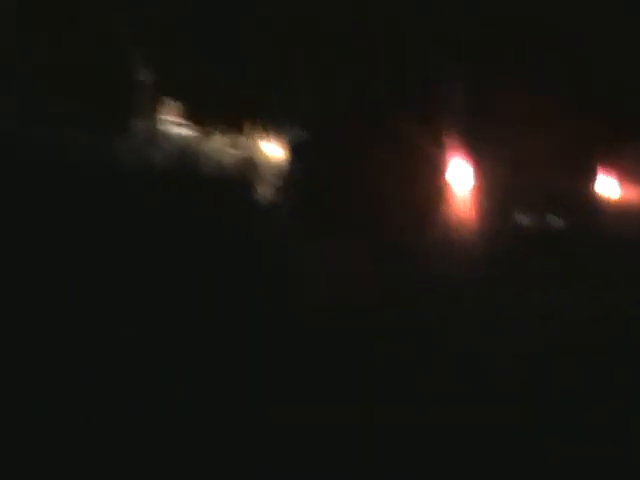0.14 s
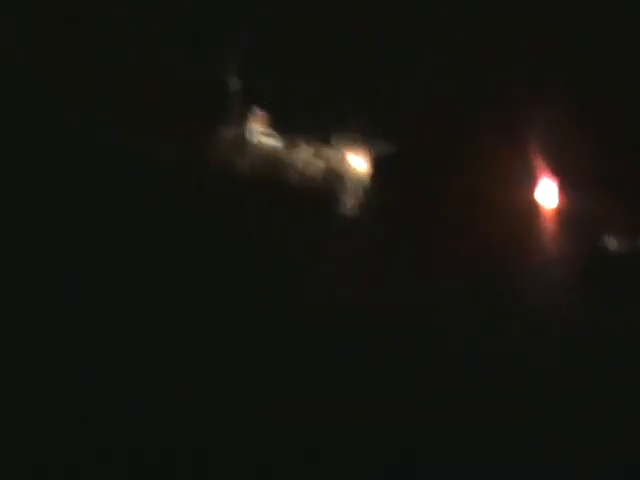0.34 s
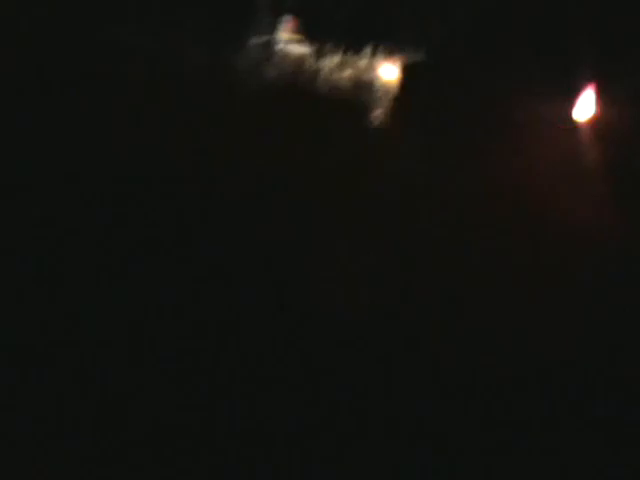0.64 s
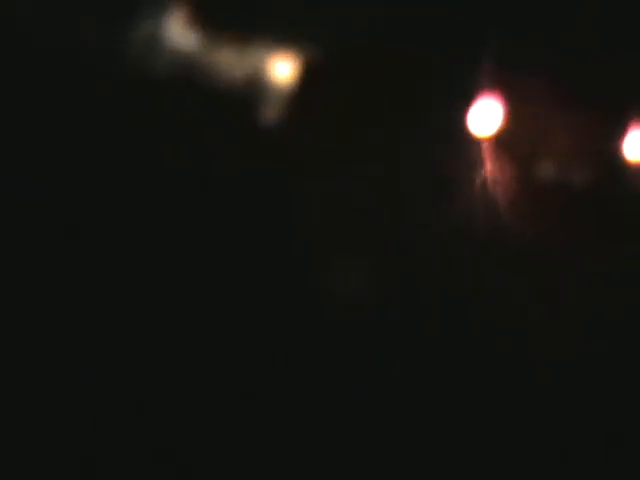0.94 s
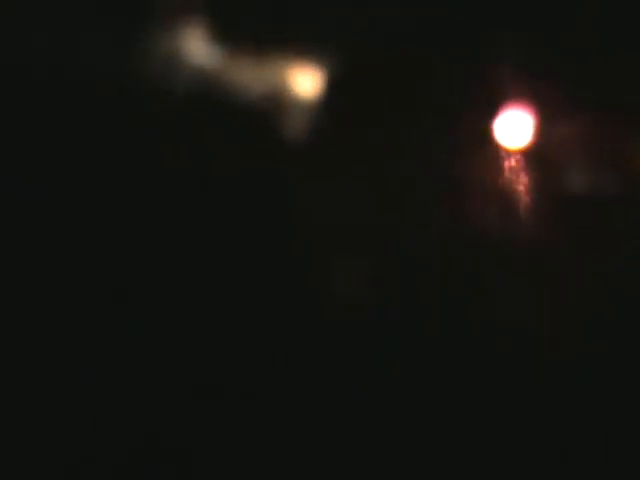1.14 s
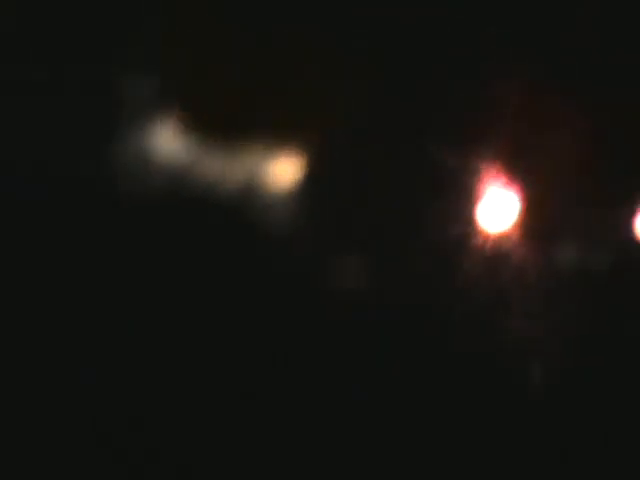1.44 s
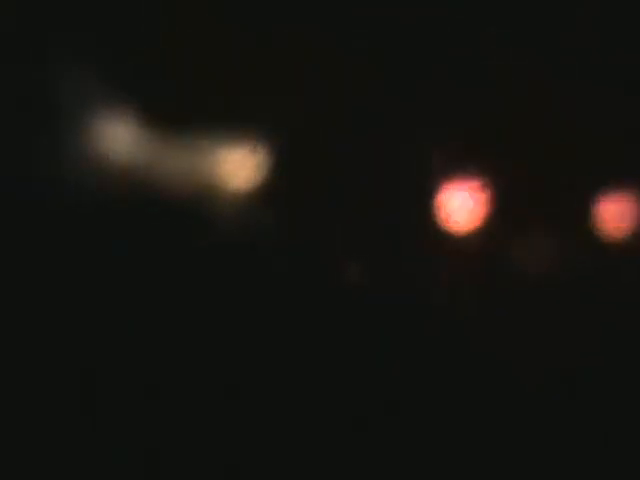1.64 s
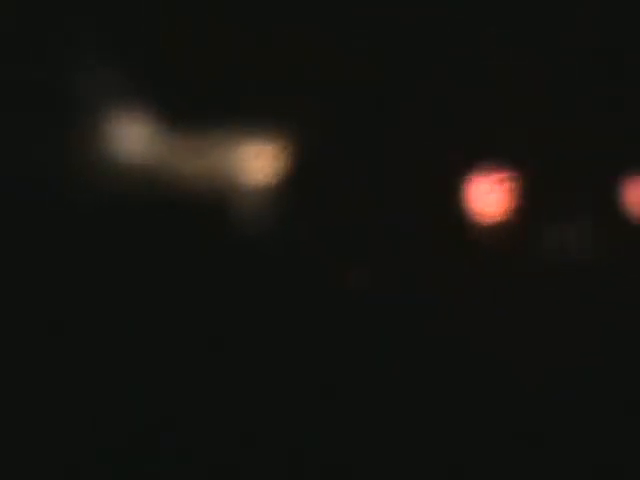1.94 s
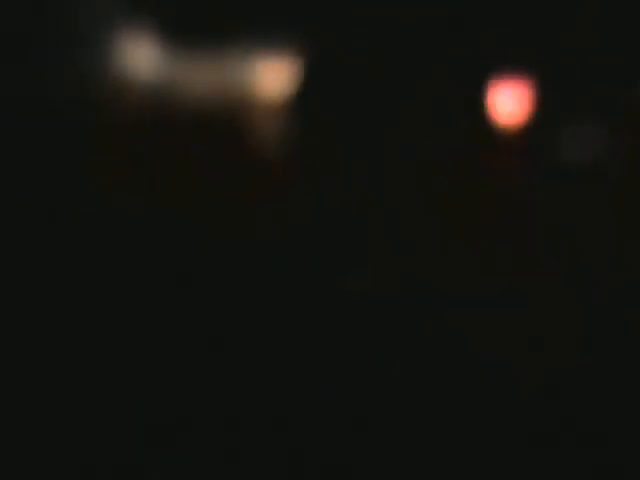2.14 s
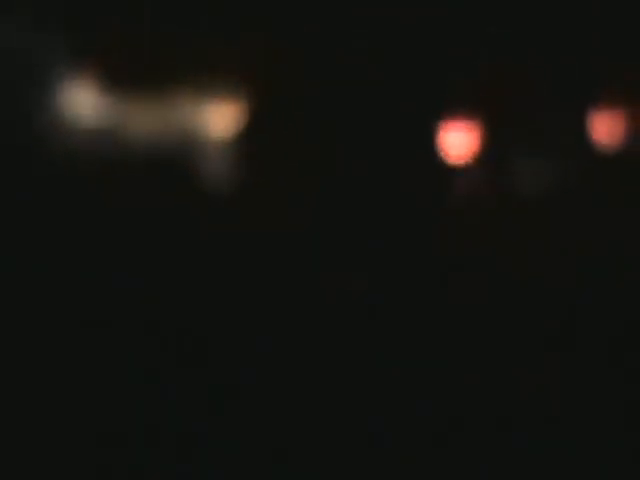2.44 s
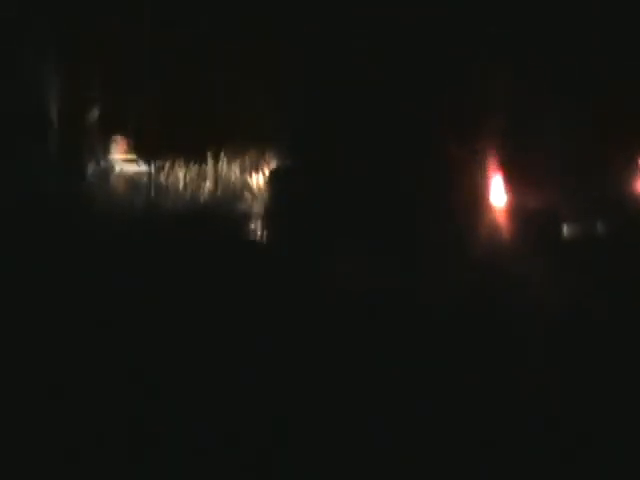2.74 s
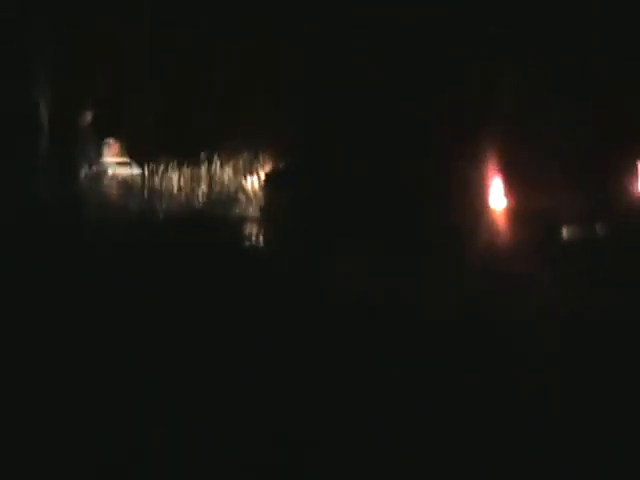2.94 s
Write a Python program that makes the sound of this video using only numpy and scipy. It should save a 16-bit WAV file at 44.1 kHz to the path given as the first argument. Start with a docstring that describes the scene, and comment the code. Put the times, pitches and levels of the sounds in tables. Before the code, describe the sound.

Engine idles low and uneven close by, sags slower, then revs up hard with rasping gas

```python
"""An engine idles close by, with soft scuffs, two faint squeaks and some ticks around it.
At idle, uneven firings from two cylinder banks boom in the exhaust over a whirr.
Then the engine slows and sags, and last it revs up hard: stronger firings ring the pipe
around a clean firing tone, while rushing gas rasps and hisses. Filtered noise and pulses plus
one clean tone; one engine-speed curve paces the firings, and tables time the rest."""
import sys
import numpy as np
from scipy import signal
from scipy.fft import rfft, irfft
from scipy.io import wavfile
from scipy.ndimage import uniform_filter1d

SR = 44100
rng = np.random.default_rng(int(sys.argv[2]) if len(sys.argv) > 2 else 0)


def master(y):
    """Save y as 16-bit WAV."""
    cut = np.clip(np.atleast_2d(y).T, -1, 1)
    pcm = np.round(cut * 32767)  # scale
    wavfile.write(sys.argv[1], SR, pcm.astype(np.int16))


N = 136710  # length in samples, 3.1 s
T = np.arange(N) / SR  # time of each sample, s
FREQS = np.maximum(np.fft.rfftfreq(2 * N, 1 / SR), 1)  # filter frequencies, Hz, kept above zero

# gas flow under throttle: (time [s], rasp level [dB], hiss level before its trim [dB])
GAS_FLOW = [(0, -97, -83), (2.1, -98, -75), (2.255, -51, -52.5), (2.272, -46, -47), (2.302, -45, -50),
            (2.313, -27.5, -37.5), (2.37, -36.5, -33.5), (2.42, -29.5, -35), (2.49, -30, -31),
            (2.52, -32, -36.5), (2.66, -29, -34.5), (2.85, -27, -32.5), (2.92, -31, -35.5),
            (3.1, -30.5, -38.5)]
# exhaust under throttle: (time [s], boom level before its trim [dB], firing tone level before its trim [dB])
THROTTLE_LEVEL = [(0, -90, -73), (2.15, -106, -70), (2.26, -46.5, -44), (2.33, -22, -22),
                  (2.45, -18.5, -19), (2.6, -18.5, -19.5), (2.74, -15.5, -17), (2.87, -18, -13),
                  (3.1, -14.5, -17.5)]


def undb(db):
    """Turn decibels into a gain."""
    return 10 ** (np.asarray(db) / 20)


def unit(x):
    """Scale a sound to an average strength (rms) of 1."""
    return x / (np.std(x) + 1e-12)


def curve(rows, axis=1):
    """Join one column of a table by straight lines in time."""
    rows = np.array(rows, float)
    return np.interp(T, rows[:, 0], rows[:, axis])


def over_hz(rows):
    """Join a table by straight lines over log frequency."""
    rows = np.array(rows, float)
    return np.interp(np.log(FREQS), np.log(rows[:, 0]), rows[:, 1])


def through(x, response):
    """Filter a sound by a frequency response, padded so that its end does not wrap around."""
    return irfft(rfft(x, 2 * N) * response)[:N]


def colour(rows):
    """Build a filter with the given spectrum that only acts after its input (minimum phase)."""
    cepstrum = irfft(np.log(undb(over_hz(rows))))
    return np.exp(rfft(2 * cepstrum[:N], 2 * N) - cepstrum[0])


def resonances(rows):
    """Add up resonators side by side; each dB sets the power that one passes from white noise."""
    total = 0
    for hz, width, db in rows:
        ring = 1 + 1j * (FREQS ** 2 - hz ** 2) / (FREQS * width)
        total = total + undb(db) / np.sqrt(width) / ring
    return total


def noise(response):
    """Make filtered noise of rms 1."""
    return unit(through(rng.standard_normal(N), response))


def band(hz, octaves):
    """Make a bell-shaped response around a centre, leaning towards the low side."""
    bell = np.exp(-(np.log2(FREQS / hz) / octaves) ** 2 / 2)
    return bell / np.sqrt(1 + FREQS / hz)


def walk(rate):
    """Wander smoothly at random with a spread of 1; a higher rate (Hz) wanders faster."""
    return noise(np.exp(-(FREQS / rate) ** 2))


def swell(at, half):
    """Rise and fall in a smooth bell shape around a moment."""
    return np.exp(-((T - at) / half) ** 2 / 2)


def whirr(puff):
    """Coloured noise behind the idle, fairly even at first and louder towards the end."""
    # spectrum: (frequency [Hz], relative level [dB])
    spectrum = [(25, 0), (100, 0), (400, 7), (560, 1.5), (720, 4.5), (1000, -4), (1400, -4), (1900, -9.5),
                (2400, -9.5), (3300, -16.5), (6000, -22.5), (10000, -27.5), (12500, -36), (16000, -21)]
    # loudness: (time [s], level [dB])
    level = [(0, -46), (.7, -47.5), (1.4, -45), (1.7, -48.5), (2.1, -46.5), (3.1, -34)]
    # the puffs make it pulse slightly with each firing
    return noise(colour(spectrum)) * puff ** 0.36 * undb(curve(level) + .5 * walk(30))


def scuffs():
    """Soft bands of noise swell and fade, with a fast random flicker that makes them grainy."""
    # (time [s], half length [s], level [dB], centre [Hz], width [octaves])
    scuff_rows = [(0.077, 0.034, -61.5, 4750, 0.73), (1.224, 0.029, -43, 930, 0.98),
                  (1.233, .04, -28, 225, 0.59), (1.218, 0.023, -58, 4200, 0.61),
                  (1.307, 0.025, -53.5, 5300, 0.62), (1.31, 0.037, -45.5, 900, 1.04),
                  (1.44, 0.022, -61.5, 7500, 0.63)]
    out = np.zeros(N)
    for at, half, db, hz, octaves in scuff_rows:
        grain_db = 2.36 * walk(150)
        out += noise(band(hz, octaves)) * undb(db + grain_db) * swell(at, half)
    return out


def squeaks():
    """Thin squeaks: noise through a set of resonances swells and fades."""
    # (time [s], half length [s], level [dB])
    squeak_rows = [(0.468, 0.011, -51), (0.531, 0.018, -54)]
    # resonances: (frequency [Hz], width [Hz], relative level [dB])
    modes = [(2360, 220, 6), (5160, 220, 4), (6300, 320, -0.5), (7300, 300, -2), (8700, 170, -0.5),
             (10300, 300, -17)]
    out = np.zeros(N)
    for at, half, db in squeak_rows:
        out += noise(resonances(modes)) * undb(db) * swell(at, half)
    return out


def ticks():
    """Ticks: a band of noise starts abruptly and dies away at once."""
    # (time [s], level at the start [dB], centre [Hz], width [octaves], decay [s])
    tick_rows = [(.161, -51, 2320, 0.13, 0.0031), (.328, -54, 4230, 0.61, 0.0094),
                 (1.055, -48, 5160, 0.75, .0015), (1.531, -54, 7900, .9, 0.0022),
                 (1.64, -39.5, 2650, 0.82, 0.0014), (2.0928, -35.5, 4001, 2.5, 0.00056)]
    out = np.zeros(N)
    for at, db, hz, octaves, decay in tick_rows:
        out += noise(band(hz, octaves)) * undb(db) * (T >= at) * np.exp(-np.abs(T - at) / decay)
    return out


def firings(turns, hz, jitter, scatter_db, burble):
    """Each firing gives a pulse and a puff of turbulence; returns their mix and the puff's envelope."""
    # order in which the two cylinder banks fire: one bank number (0 or 1) per firing
    bank_order = np.array([0, 1, 0, 0, 1, 0, 1, 1])
    lag_s, bank_db = .0017, -1  # the second bank's pipe is longer and weaker, so the beat lopes
    count = np.arange(1, int(turns[-1]))
    chance = rng.standard_normal((400, 2))[count]
    bank = bank_order[count % len(bank_order)]

    at_s = np.interp(count + jitter * chance[:, 0], turns, T) + bank * lag_s
    at = np.sort(np.minimum((at_s * SR).astype(int), N - 1))  # in samples
    size = undb(bank * bank_db + scatter_db * chance[:, 1])
    pulses = np.zeros(N)
    pulses[at] = size * np.sqrt(SR / hz[at])  # keeps the power even as firings crowd together

    last = np.maximum(np.searchsorted(at, np.arange(N), side="right") - 1, 0)  # latest firing
    cycles_since = np.abs(T - at[last] / SR) * hz
    # each puff fades with the firing cycle, on top of a constant flow
    puff = uniform_filter1d(size[last] * (1 + np.exp(-cycles_since)), size=24)
    turbulence = unit(puff * rng.standard_normal(N))
    drive = unit(burble * turbulence - unit(pulses))
    return drive, puff / np.sqrt(np.mean(puff ** 2))


def idle_boom(drive):
    """Soft firings boom in the silencer, which acts as a filter."""
    # spectrum: (frequency [Hz], relative level [dB])
    spectrum = [(20, -28), (44, -13.5), (62, -7.5), (82, -0.5), (125, 3), (155, -2), (180, -8), (210, -1),
                (240, -10.5), (315, -7.5), (345, -20.5), (385, -47), (600, -44.5), (1500, -65.5)]
    # loudness: (time [s], level [dB])
    level = [(0, -26), (.45, -24), (1.15, -27.5), (1.25, -24.5), (1.45, -30.5), (1.95, -30.5), (2.2, -27),
             (2.29, -19), (2.4, -31.5), (3.1, -45)]
    return unit(through(drive, colour(spectrum))) * undb(curve(level))


def idle(turns, hz):
    """The idling engine: exhaust boom over a whirr, both paced by the same firings."""
    # jitter in firing cycles, scatter in dB, burble as turbulence against pulses
    drive, puff = firings(turns, hz, jitter=.022, scatter_db=.95, burble=1)
    return whirr(puff) + idle_boom(drive)


def gas_hiss(puff):
    """Rushing gas: broad noise and thin flickering rings, pulsing with the puffs."""
    # spectrum of the broad part: (frequency [Hz], relative level [dB])
    spectrum = [(200, -14), (800, 5), (1700, 6), (2600, -6.5), (3150, -3), (3600, 5), (3900, -4),
                (4200, -4.5), (4600, 1.5), (5800, 2), (7000, -2.5), (7800, -4), (10000, -5), (11500, -15.5),
                (12600, -56), (14500, -49), (16000, -36)]
    # thin rings: (frequency [Hz], width before double filtering [Hz], level against the broad part [dB])
    rings = [(4193, 340, -10.5), (5290, 240, -15.5), (5934, 360, -13.5), (6440, 300, -15), (7200, 360, -14)]
    hiss = noise(colour(spectrum))
    for hz, width, db in rings:
        ring = noise(resonances([(hz, width, 0)]) ** 2)  # squared: filtered twice, so narrower
        hiss = hiss + ring * undb(db + 3.0 * walk(24))
    trim_db = -1.3
    return hiss * undb(curve(GAS_FLOW, axis=2) + trim_db + 1.1 * walk(27)) * puff ** 0.73


def gas_rasp(hz, puff):
    """Gas excites resonances in a band that climbs with engine speed; each puff rasps."""
    # (frequency [Hz], width before double filtering [Hz], level before the climbing band [dB])
    modes = [(1923, 150, 4.5), (2137, 136, 3.5), (2286.3, 64, 0.5), (2380, 150, 0), (2520, 69, -8.5),
             (2660, 130, -2.5), (2875, 210, -1)]
    centre = 2022 + 4.42 * hz  # middle of the excited band, Hz
    octaves = .2  # spread of that band
    rasp = np.zeros(N)
    for mode_hz, width, db in modes:
        excited = np.exp(-(np.log2(mode_hz / centre) / octaves) ** 2 / 2)
        rasp += noise(resonances([(mode_hz, width, 0)]) ** 2) * undb(db) * excited
    flutter_db = -.46 * walk(40)
    return unit(rasp) * undb(curve(GAS_FLOW) + flutter_db) * puff


def firing_tone(turns):
    """A clean tone with one swing per firing, its strength wavering a little."""
    tone = -np.cos(2 * np.pi * turns) * undb(2.0 + 1.2 * walk(14.04))
    return tone * undb(curve(THROTTLE_LEVEL, axis=2))


def throttle_boom(drive):
    """Hard firings boom in the exhaust and ring the pipe's resonances."""
    # spectrum: (frequency [Hz], relative level [dB])
    spectrum = [(20, -24), (45, -8.5), (85, -3), (125, -0.5), (160, -1.5), (200, 1.5), (290, -2),
                (380, -12), (500, -14.5), (560, -22.5), (660, -19), (900, -31), (1600, -44), (4000, -82)]
    # pipe resonances: (frequency [Hz], width [Hz], level before the throttle curve [dB])
    pipe = [(207.4, 13, -14.5), (470.4, 11.28, -9.5), (988, 19, -28), (1190, 28, -30)]
    boom = unit(through(drive, colour(spectrum))) * undb(3.0)
    for row in pipe:
        boom = boom + undb(row[2]) * unit(through(drive, resonances([row])))
    return boom * undb(curve(THROTTLE_LEVEL))


def rev(turns, hz):
    """The revving engine: boom, firing tone, rasp and hiss, all following the engine speed."""
    drive, puff = firings(turns, hz, jitter=.025, scatter_db=1.6, burble=.6)
    return gas_hiss(puff) + gas_rasp(hz, puff) + firing_tone(turns) + throttle_boom(drive)


def ports(sound):
    """A sound at two close microphone ports, with a little scatter from the surroundings."""
    # phase by which the left port leads: (frequency [Hz], phase [radians])
    lead = [(40, 1.2), (130, 1.3), (200, 1.6), (470, 1.85), (700, 1.7), (1000, 1.32), (1900, .9),
            (2400, .6), (3700, .12), (5000, .2), (7000, .04), (10000, -.1), (11500, -.65), (15000, -.2)]
    # left minus right: (frequency [Hz], level difference [dB])
    balance = [(40, 3.5), (120, 0.8), (400, 0), (1000, 1.5), (2300, 2.5), (4000, 2.6), (10000, -.4)]
    scatter_db, decay_s = -19, .027
    channels = []
    for side in (1, -1):  # left, right: each takes half of the difference
        port = undb(side * over_hz(balance) / 2) * np.exp(1j * side * over_hz(lead) / 2)
        tail = rng.standard_normal(N) * np.exp(-T / decay_s)
        scatter = undb(scatter_db) * rfft(tail / np.linalg.norm(tail), 2 * N)
        channels.append(through(sound, port + scatter))
    return np.array(channels)


def scene():
    """One engine speed drives the idle and the rev; small sounds lie on top."""
    # engine speed before a slight random drift: (time [s], firings per second [Hz])
    speed = [(0, 42.32), (.56, 46.61), (.93, 45.27), (1.04, 44.57), (1.22, 44.8), (1.5, 42.18),
             (1.66, 36.92), (1.81, 33.43), (1.99, 33.27), (2.15, 35.25), (2.24, 40.99), (2.3, 47.57),
             (2.41, 62.43), (2.5, 77.32), (2.604, 91.53), (2.72, 105.1), (2.854, 117.9), (3.1, 137.3)]
    hz = curve(speed) * (1 + .004 * walk(12))
    turns = np.cumsum(hz) / SR  # firing cycles so far
    small_sounds = scuffs() + squeaks() + ticks()
    return ports(small_sounds + idle(turns, hz) + rev(turns, hz))


def record(dry):
    """The recorder rounds the very highest peaks, adds faint hiss, dulls and cuts the top."""
    # tone of the microphone's top end: (frequency [Hz], level [dB])
    mic_top = [(11000, 0), (12700, -4), (14000, -7), (16000, -7)]
    ceiling = .88  # largest value the rounding lets through
    hiss_db, top_hz = -68, 15600  # hiss before the filters; start of the steep cut
    rounded = dry / (1 + (dry / ceiling) ** 6) ** (1 / 6)
    heard = []
    for channel in rounded:
        hissy = channel + undb(hiss_db) * rng.standard_normal(N)
        heard.append(through(hissy, undb(over_hz(mic_top))))
    steep_cut = signal.ellip(12, .1, 80, top_hz, fs=SR, output="sos")
    return signal.sosfilt(steep_cut, heard)


dry = scene()
out = record(dry)
master(out)
```